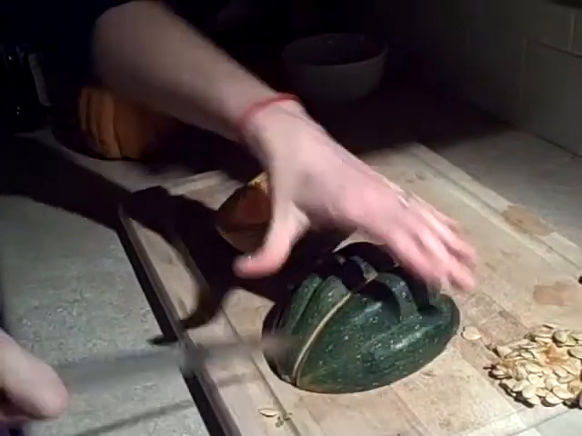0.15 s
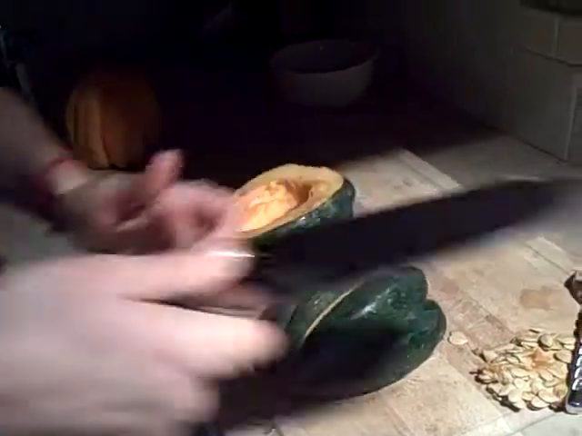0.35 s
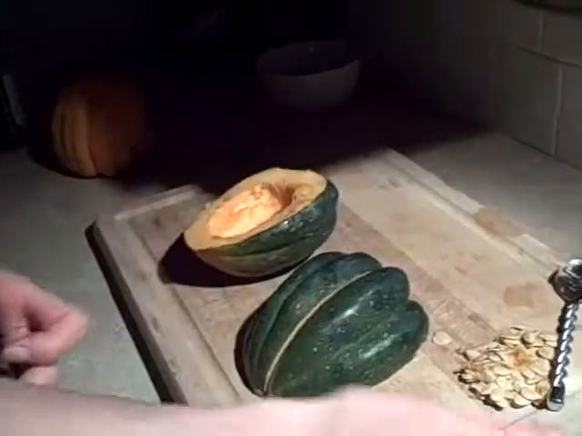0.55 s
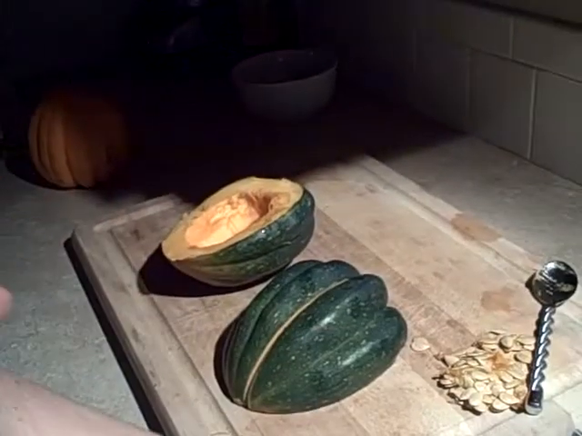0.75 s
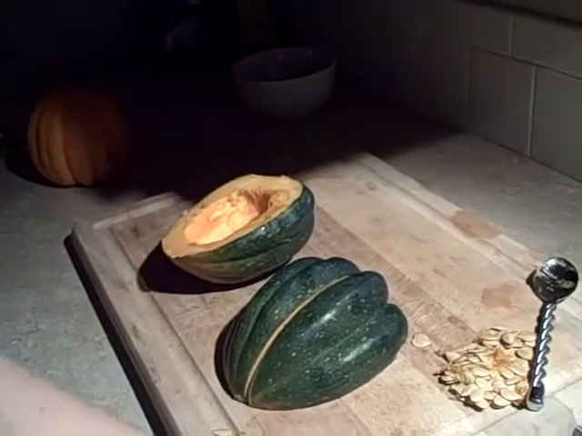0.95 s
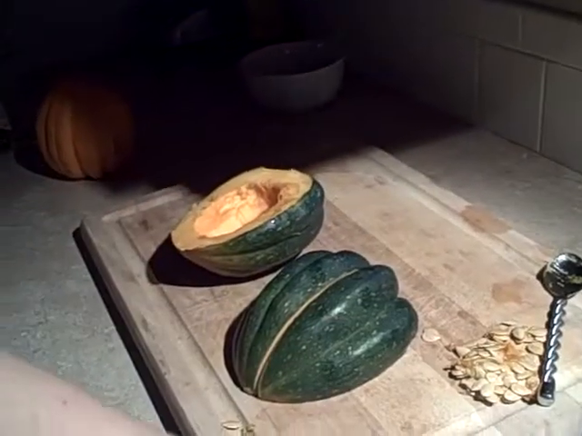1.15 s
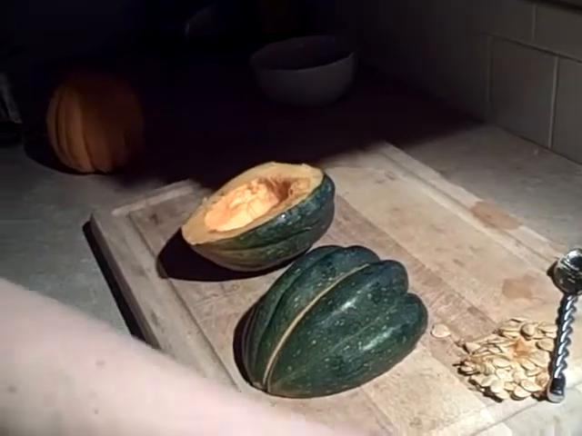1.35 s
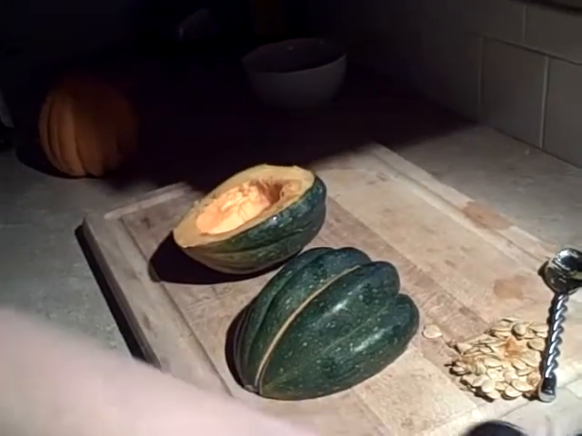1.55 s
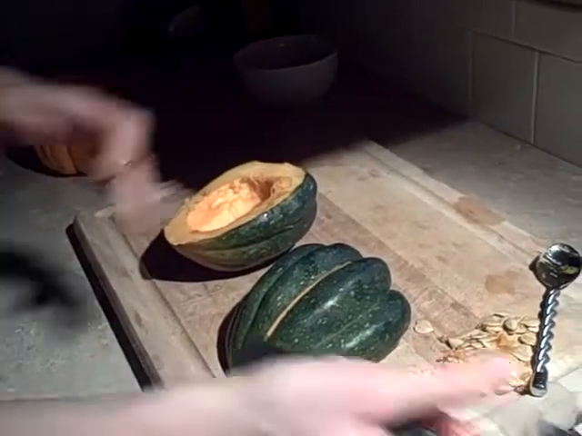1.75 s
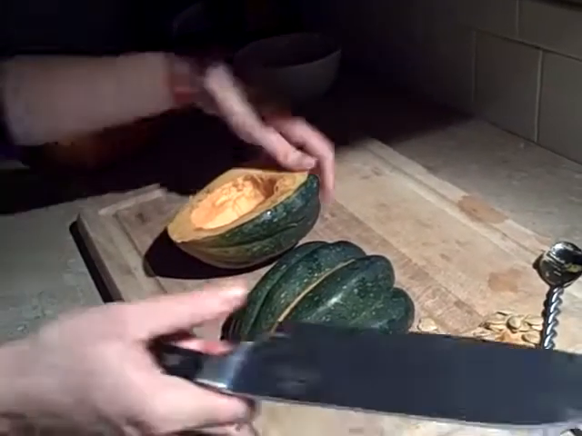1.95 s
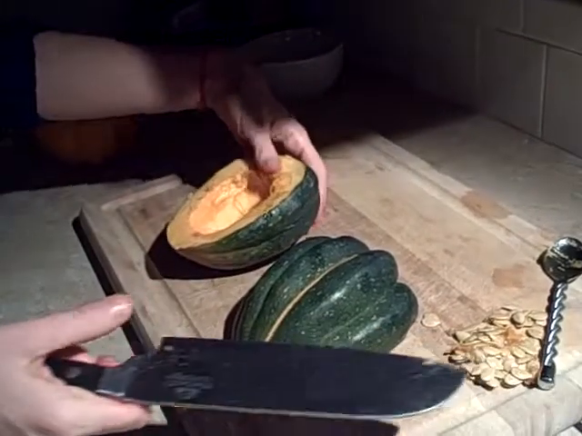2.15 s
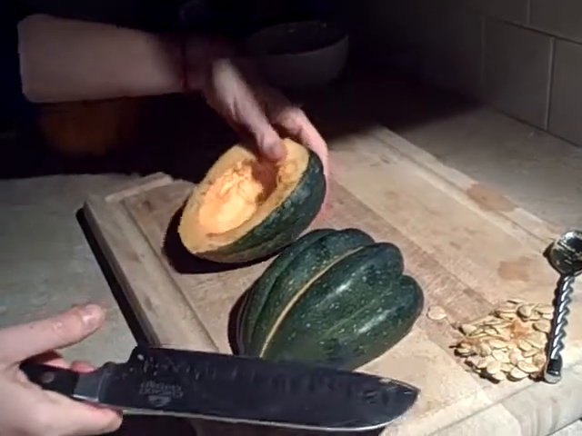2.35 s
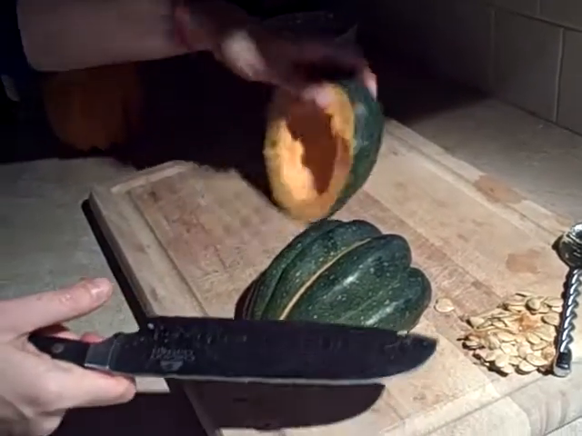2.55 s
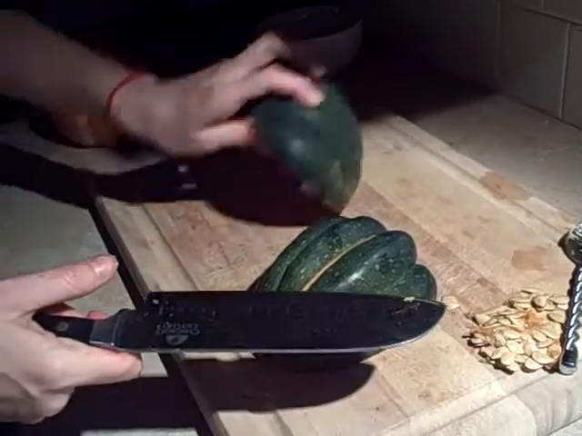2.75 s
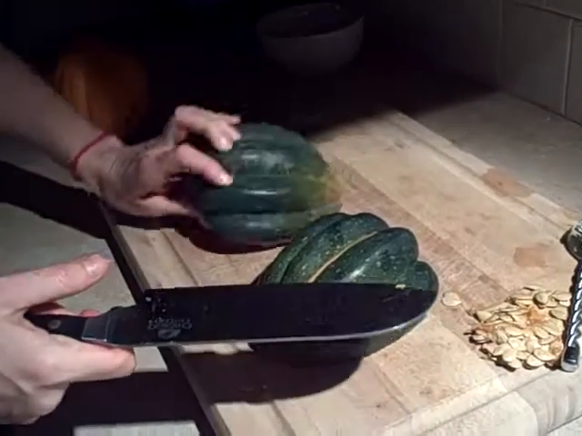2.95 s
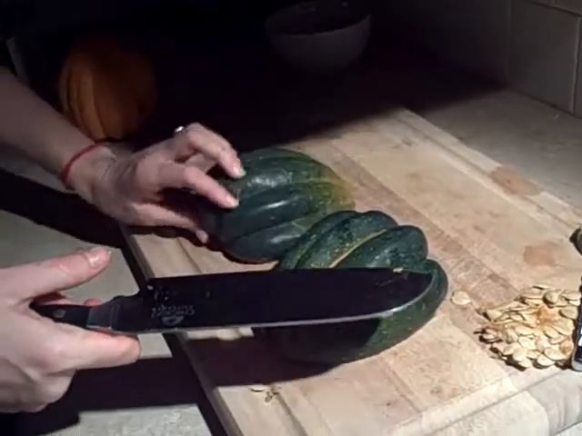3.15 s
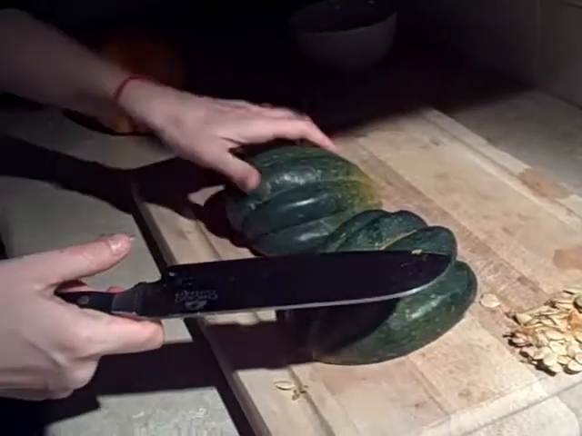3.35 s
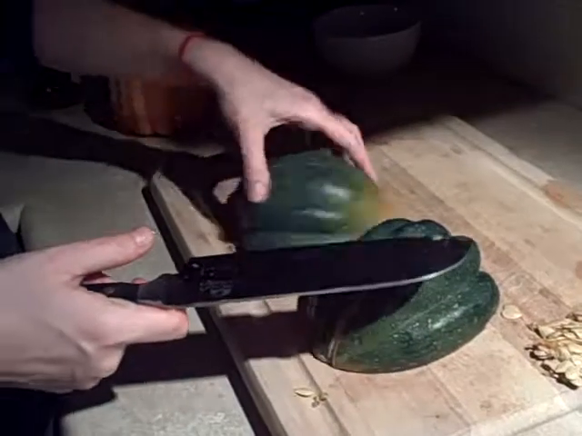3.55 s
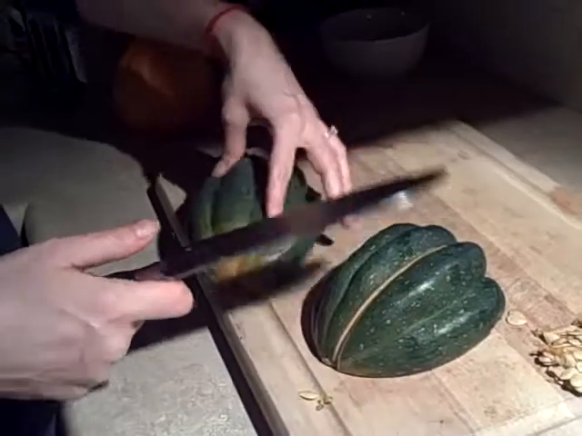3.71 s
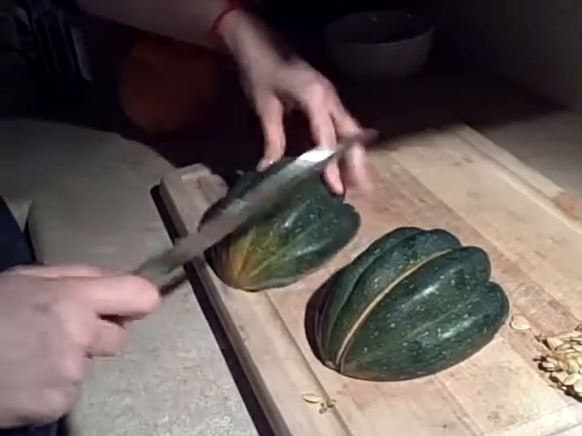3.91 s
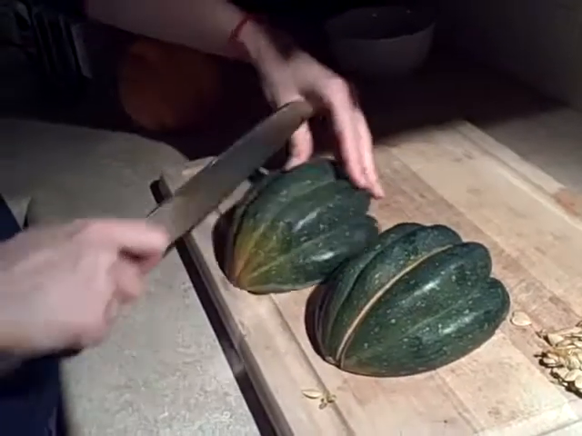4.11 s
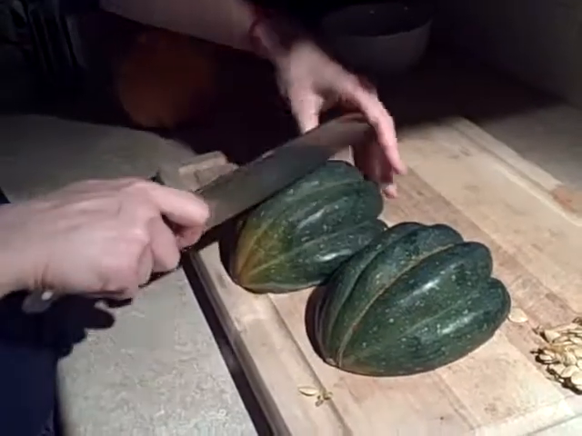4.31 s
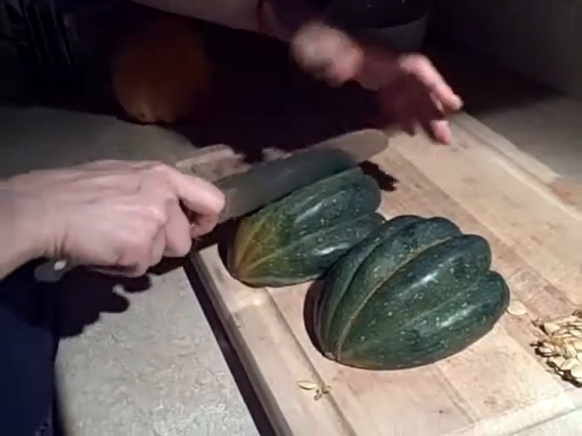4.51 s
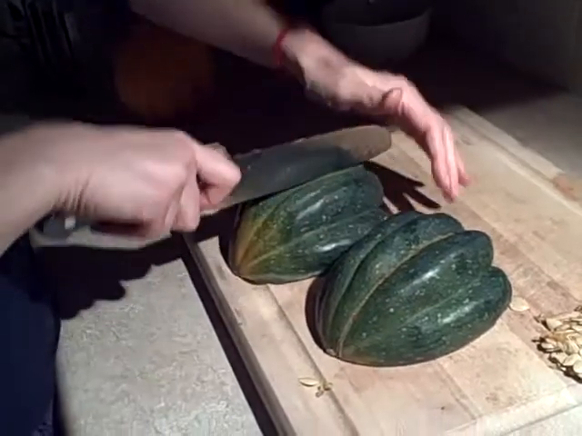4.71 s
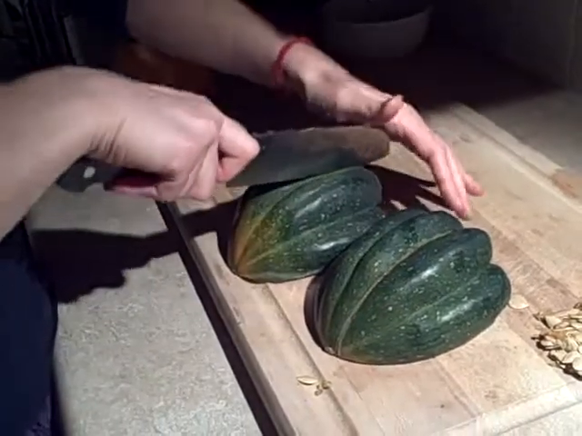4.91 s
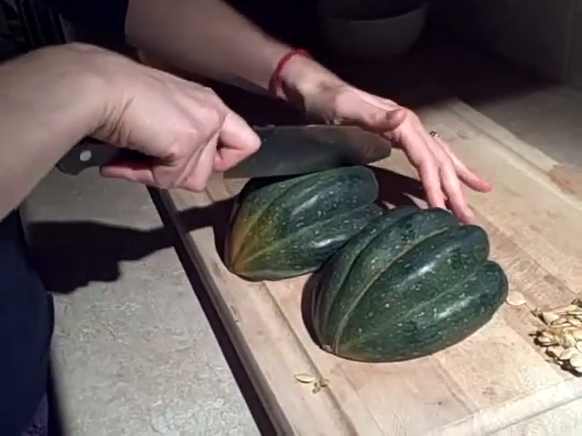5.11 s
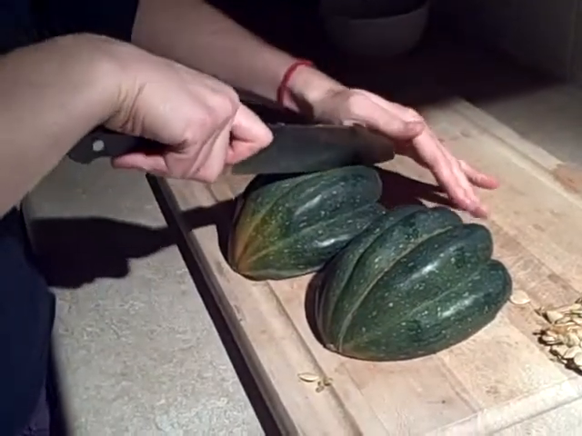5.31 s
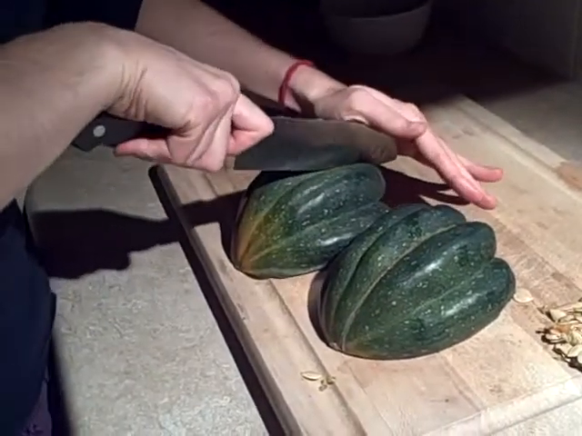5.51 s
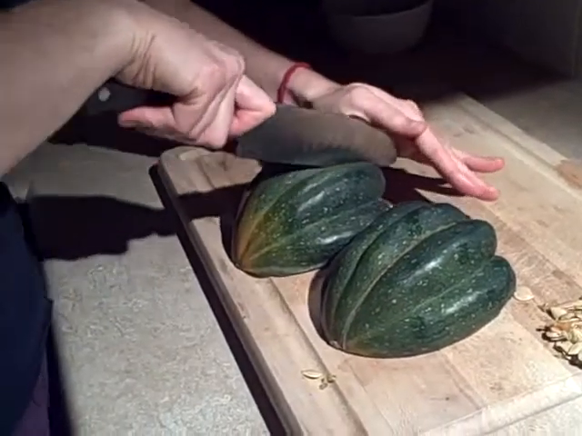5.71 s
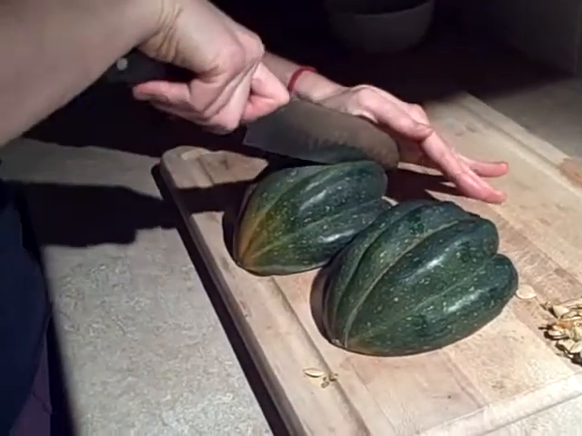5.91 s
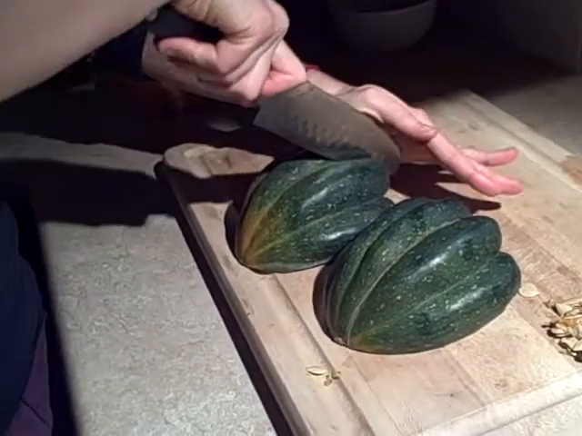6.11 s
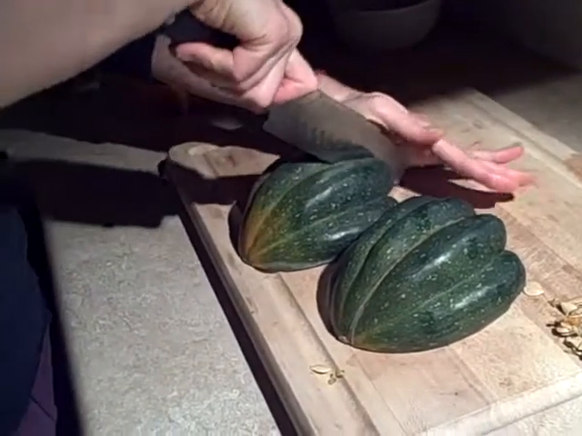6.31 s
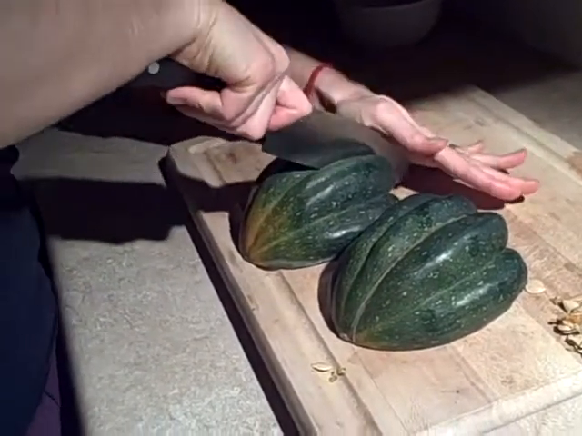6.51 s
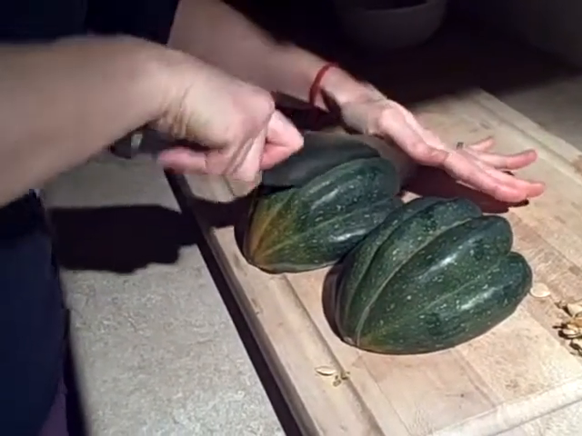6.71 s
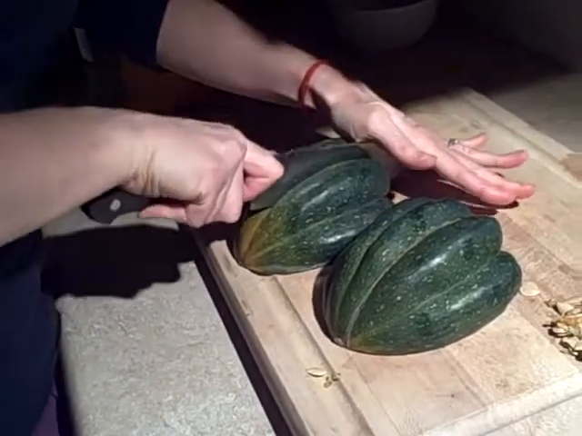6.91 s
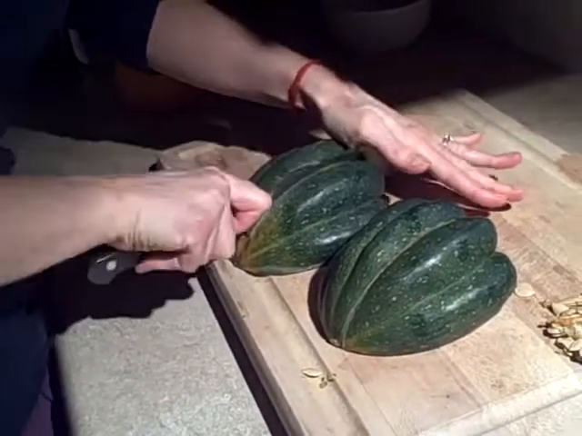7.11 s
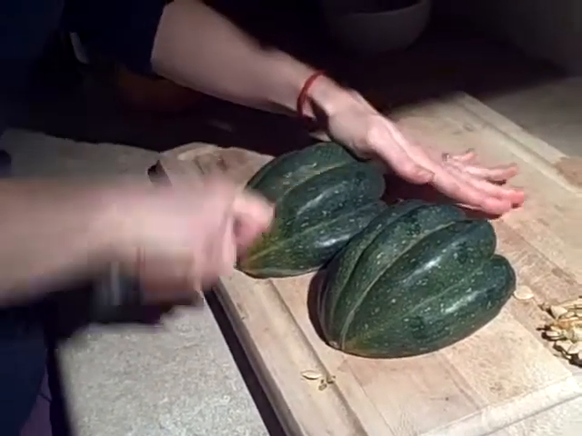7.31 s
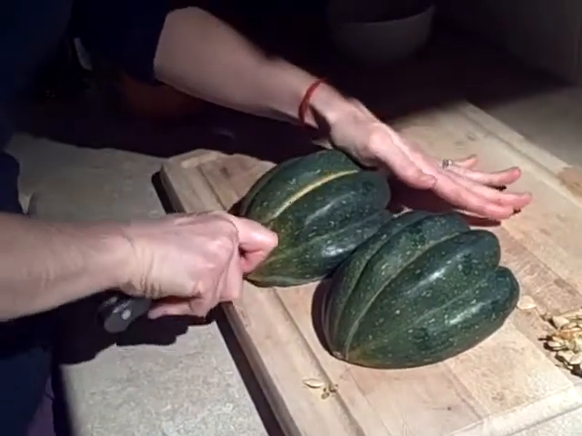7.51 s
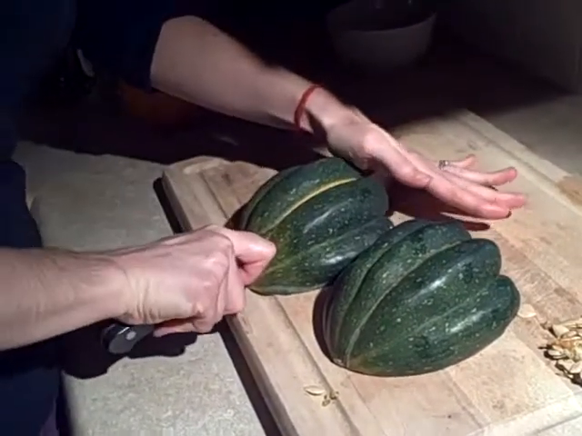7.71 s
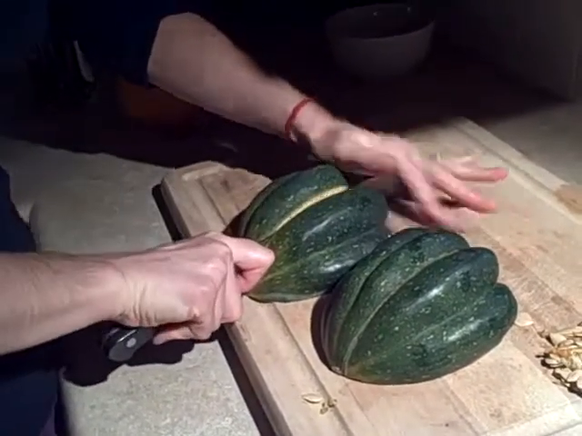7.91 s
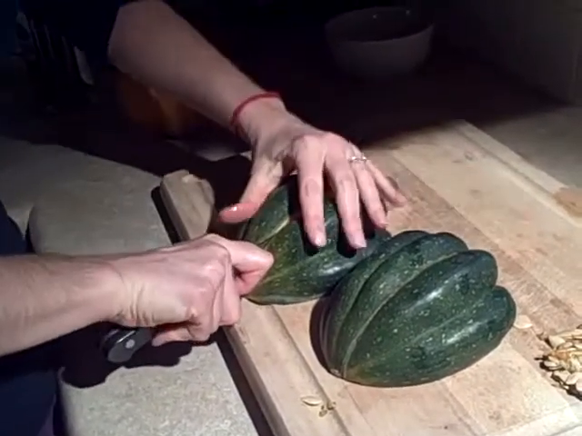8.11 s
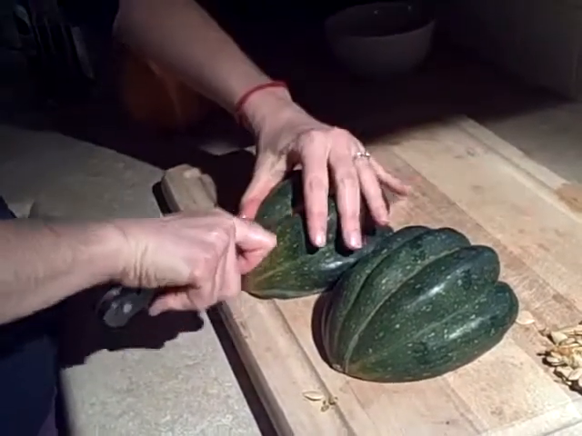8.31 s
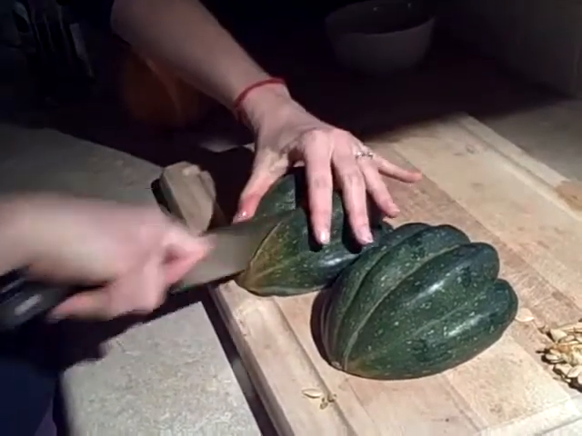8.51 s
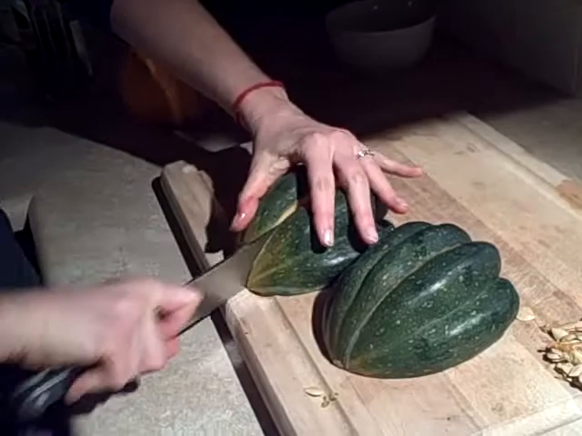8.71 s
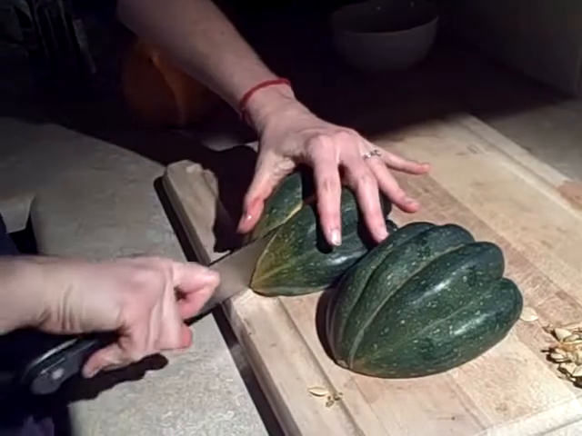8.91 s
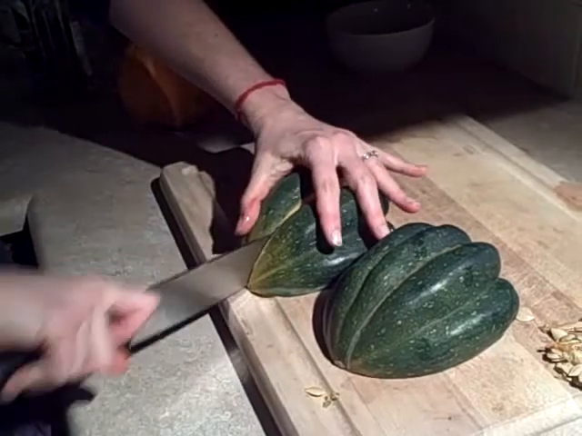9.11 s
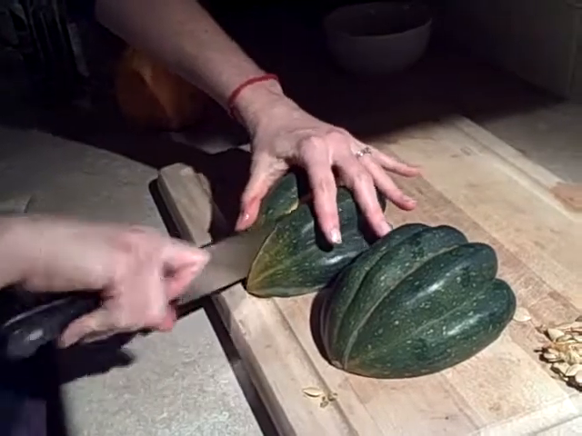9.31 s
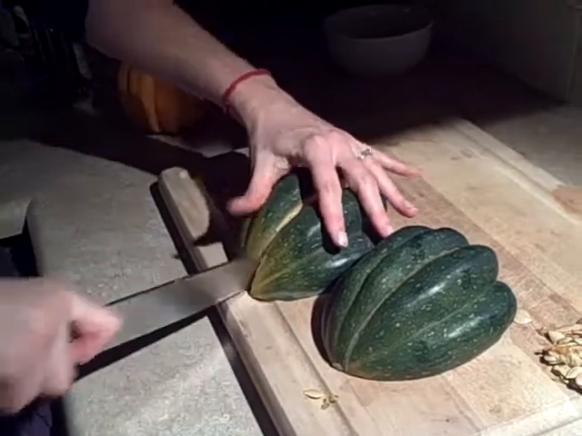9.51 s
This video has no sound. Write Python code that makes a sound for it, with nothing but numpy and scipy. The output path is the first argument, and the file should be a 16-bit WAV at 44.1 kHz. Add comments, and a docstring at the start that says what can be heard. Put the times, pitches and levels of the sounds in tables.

```python
"""A knife rocks through a hard squash in short tearing slips, slams into a wooden board and is drawn out.
The squash crackles and creaks, the board rings, and the blade rubs and hisses in the wet slit.
Before the cutting, loose metal, perhaps cutlery in a drawer, slides and jingles nearby and bangs once.
The counter thumps under the hands over a quiet hiss. One microphone is near the board in a home kitchen."""
import sys
import numpy as np
from scipy import signal
from scipy.fft import rfft, irfft
from scipy.io import wavfile
from scipy.ndimage import uniform_filter1d

SR = 44100
rng = np.random.default_rng(int(sys.argv[2]) if len(sys.argv) > 2 else 0)


def put_to_file(sound):
    """Save the sound as 16-bit audio at rate SR, in the file named by the first command-line argument."""
    columns = np.atleast_2d(sound).T  # one column per channel
    safe = np.clip(columns, -1, 1)
    whole_steps = np.round(safe * 32767)
    wavfile.write(sys.argv[1], SR, whole_steps.astype(np.int16))


N = 421155

# Shakes of the loose metal. Each row: peak time in seconds, treble level in dB, rise and fall in seconds.
METAL_SHAKES = [(.385, -38, 0.0083, 0.12), (.572, -46.5, 0.027, 0.12), (.675, -43, 0.0091, 0.1),
                (.83, -36, 0.016, 0.67), (.92, -35.5, 0.053, 0.15), (1.063, -30, 0.16, 0.14),
                (1.277, -26, 0.17, .15), (1.492, -31, 0.22, .18), (1.646, -26, 0.083, 0.25),
                (1.906, -35, 0.31, 0.1), (2.045, -35.5, 0.076, 1), (2.19, -32, 0.2, 0.3),
                (2.385, -30.5, 0.071, 0.22), (2.679, -27, 0.11, 0.24), (2.978, -35.5, 0.31, 0.12),
                (3.16, -36.5, 0.034, .2), (3.193, -24.5, 0.022, 0.28), (3.34, -37, 0.22, .047),
                (3.542, -29.5, .1, .16), (3.881, -29.5, 0.3, 0.12), (4.07, -45, 0.087, 0.077)]
# The counter's deep notes. Each row: pitch in Hz, level in dB, seconds to fade by 60 dB (called t60).
COUNTER_NOTES = [(52, -3, .12), (74, 0, .14), (130, -7, .07), (200, -10, .06)]


def cut():
    """Fibres snap in a crackling tear; the hollow squash creaks with each slip of the knife."""
    # Each row: peak time in seconds, level in dB, rise and fall in seconds, creak in dB above the tear.
    knife_slips = [(4.265, -66, 0.02, 0.16, 5), (4.97, -60.5, 0.091, 0.1, -14), (5.5, -63, 0.049, 0.15, -4),
                   (6.17, -65.5, 0.27, 0.11, 6), (6.292, -43, 0.004, 0.09, 2.5),
                   (6.351, -47, 0.085, 0.019, 3), (6.535, -45.5, 0.045, 0.024, 6),
                   (6.745, -45, 0.044, 0.033, 5.5), (6.865, -46, 0.0053, .1, -7),
                   (6.924, -43, 0.078, 0.051, 1.5), (7.125, -43, 0.053, 0.12, 1),
                   (7.303, -45.5, 0.006, 0.036, 1), (7.346, -25, 0.0075, 0.0068, -3.5),
                   (7.482, -39.5, 0.018, .008, -4), (7.498, -29, 0.042, 0.027, 1),
                   (7.565, -50, 0.0034, 0.016, -1), (7.58, -61.5, 0.044, 0.071, 18),
                   (8.83, -43, 0.039, 0.12, 9)]
    # The tone of the tear. Each row: frequency in Hz, level in dB.
    tear_tone = [(700, -31.5), (1000, -10.5), (3580, -3.5), (9280, -9), (16000, -7)]
    # The notes of the creak. Each row: pitch in Hz, width in Hz, level in dB.
    creak_notes = [(365.5, 80, 5), (599, 40, -1.5), (799, 180, -7), (1010, 70, -5.5)]
    tear_db, creak_db = strokes(knife_slips, round_top=1.61)
    tear = colour(grit(spread_db=2.5, grain_s=0.00089), tear_tone)
    creak = body(grit(spread_db=1.5, grain_s=.003), creak_notes, wander_db=4.0, wander_rate=8, drift=.1)
    return undb(tear_db) * (tear + undb(creak_db) * creak)


def knocks():
    """Each blow rings board and squash, thumps the counter and starts with a short crack."""
    # Each row: start in seconds, strength in dB, thump and crack offsets in dB, hardness in dB per octave.
    blows = [(2.129, -41.5, 4, 8, -11), (3.243, -26, 5.5, -6, -27), (3.812, -23, -3, -12, -6.5),
             (3.834, -23.5, -1.5, -5, -18), (4.261, -44, -10, -10, 0), (4.329, -29.5, -3.5, -1.5, -8),
             (4.63, -32.5, -4.5, 1, 5.5), (5.838, -41, -6, 13, 14), (6.365, -43.5, 13.5, -17, 3),
             (6.509, -42.5, 14, -3, 13), (6.532, -16, -6, -14, -15.5), (7.315, -36.5, 10, 23.5, 14.5),
             (7.349, -2, -19, -2, 4), (7.363, -12, -16, -18.5, -2.5), (7.536, -22.5, -2, -26, 3.5),
             (7.769, -36.5, 2, -20.5, -4), (8.063, -40, -4, 6, 3), (8.082, -41, -2, -25, 9.5),
             (8.8, -17, -12.5, -5, -1), (8.813, -23, -17, 15, 11.5), (8.906, -23.5, -1.5, -18, -2)]
    # The notes of the board and of the squash. Each row: pitch in Hz, level in dB, fade time in seconds.
    board_notes = [(567, -7, .09), (682, -9, .08), (838, 0, .11), (905, -1, .11), (1042, -7, .08),
                   (1340, -10, .07), (1534, -9, .06)]
    squash_notes = [(250, -9, .05), (366, -3, 0.042), (460, -3, 0.051), (594, -3.5, 0.049), (748, 1, 0.058),
                    (1245, -3.5, 0.044), (1540, -7, 0.052)]
    out, t = np.zeros(N), np.arange(int(.3 * SR)) / SR
    for s, db, thump_db, crack_db, tilt_db in blows:
        noise = rng.standard_normal(len(t))
        free = np.clip(1.5 + db / 40, .3, 1)  # a light touch stays pressed on the wood and damps it
        board_db = 1.24 * db  # lighter blows lose extra ring
        add(out, s, undb(board_db) * ring(board_notes, tilt_db, noise, free=free))
        add(out, s, undb(db - 1.5) * ring(squash_notes, tilt_db / 2, noise[50:], detune=.05))
        overtones = crunch(noise, tilt_db, low_t60=0.062 * free, high_t60=0.02 * free)
        add(out, s, undb(db + tilt_db / 2 + 2.0) * overtones)
        add(out, s, undb(db + thump_db) * ring(COUNTER_NOTES, 0, noise, detune=0.039, push_s=0.011))
        crack = np.diff(noise, prepend=0) * np.exp(-t / 0.0066) * np.clip(t / 0.0017, 0, 1)
        add(out, s, undb(db + crack_db - 17.5) * crack)
    return out


def crunch(noise, tilt_db, low_t60, high_t60):
    """The countless close overtones of wood blur into noise whose treble dies first."""
    t = np.arange(len(noise)) / SR
    low = signal.lfilter(*signal.butter(1, [400, 2600], "band", fs=SR), noise) * 1000 ** (-t / low_t60)
    high = signal.lfilter(*signal.butter(1, [2600, 8000], "band", fs=SR), noise) * 1000 ** (-t / high_t60)
    return (low + undb(2 * tilt_db - 14.0) * high) * np.clip(t / 0.0043, 0, 1)


def draw_blade():
    """The blade rubs along the slit, sounds its hollow notes, hisses wetly and sings in shifting bands."""
    # Each row: peak time in seconds, level in dB, rise and fall in seconds,
    # treble and upper-note offsets in dB, pitch ratio.
    pulls = [(.14, -48, 0.14, .09, 0.5, -11, 0.99), (8.53, -49.5, 0.032, .2, -3.5, -16, 1.03),
             (8.63, -44, 0.097, 0.23, -1.5, -5, .97), (8.72, -43.5, .16, 0.058, -3, -11.5, 1.046),
             (9.03, -62, 0.034, 0.082, 7, -12, 0.94), (9.12, -46.5, .035, 0.095, -7, -14, 1.03),
             (9.19, -38.5, 0.089, 0.076, -2.5, -6, 1.01), (9.36, -41.5, 0.11, 0.067, -2, -9.5, 0.99),
             (9.54, -43, 0.098, 0.12, -5, -8, 0.95)]
    # The slit's low and upper notes. Each row: pitch in Hz, width in Hz, level in dB.
    low_notes = [(675, 400, 2), (940, 62, -4.5), (1508, 78, 7)]
    upper_notes = [(2150, 290, -10.5), (2913, 200, -15), (3640, 300, -9)]
    # The tone of the wet hiss. Each row: frequency in Hz, level in dB.
    wet_tone = [(4000, -37), (5000, 3.5), (16000, 1)]
    rub_db, treble_db, upper_db, pitch = strokes(pulls, round_top=1.7)
    pitch = uniform_filter1d(pitch, SR // 10)  # the slit changes shape gradually
    slips = grit(spread_db=2.0, grain_s=.002)
    focused = sum(resonate(slips, hz, 3 * width) for hz, width, _ in low_notes + upper_notes)
    hollow = body(focused, low_notes, wander_db=3.0, wander_rate=14, drift=.02, pitch=pitch)
    upper = body(focused, upper_notes, wander_db=4.0, wander_rate=12, drift=.04, pitch=pitch)
    wet = colour(grit(spread_db=2.0, grain_s=0.001), wet_tone)
    bands = [(hz, 200, 0) for hz in rng.uniform(4200, 15300, size=12)]  # each 200 Hz wide
    singing = body(slips, bands, wander_db=9.0, wander_rate=20)
    treble = undb(-6) * wet + undb(-6.5) * singing
    return undb(rub_db) * (hollow + undb(upper_db) * upper + undb(treble_db) * treble)


def jingle():
    """Dense tiny collisions ring the loose metal over a broad scrape."""
    # The metal's notes. Each row: pitch in Hz, width in Hz, level in dB.
    metal_notes = [(2084, 130, -9), (3235, 66, -2), (4660, 190, -8), (6000, 170, -2.5), (7590, 110, -1.5),
                   (8660, 66, -3), (10210, 42, 6), (11550, 61, 5), (13700, 310, 3), (15230, 280, 2)]
    # The tones of its hiss and its scrape. Each row: frequency in Hz, level in dB.
    hiss_tone = [(6700, -53), (7000, -8), (7700, 6.5), (16000, 1.5)]
    scrape_tone = [(300, -18.5), (750, -8), (1130, -4.5), (2660, -5.5), (3650, -3.5), (6800, -2),
                   (8000, -32)]
    treble_db, = strokes(METAL_SHAKES, round_top=1.28)
    sliding_db = np.minimum(-43 + 0.7 * (treble_db + 31.5), treble_db - 5.5)  # swings less than the treble
    sliding = np.arange(N) / SR > 0.78  # the scrape is weaker until the sliding starts
    scrape_db = np.where(sliding, sliding_db, treble_db - 15.5)
    slips = grit(spread_db=1.0, grain_s=.0006)
    rings = body(slips, metal_notes, wander_db=3.5, wander_rate=14, drift=.007)
    treble = colour(slips, hiss_tone) * undb(-5.5) + rings * undb(-5.0)
    scrape = colour(slips, scrape_tone)
    return undb(treble_db) * treble + undb(scrape_db) * scrape + clinks(treble_db - 5.0)


def clinks(level_db, count=700):
    """Countless small pieces each give a brief pure note, as hard as they are shaken."""
    out, t = np.zeros(N), np.arange(SR // 8) / SR
    first_s, last_s = METAL_SHAKES[0][0], METAL_SHAKES[-1][0]
    for when, pitch, softness, length in rng.random((count, 4)):
        s = first_s + when * (last_s - first_s)
        db = level_db[int(s * SR)] - 14 * softness
        hz, t60 = 7200 + 8300 * pitch, 0.076 + 0.074 * length
        add(out, s, undb(db) * np.sin(2 * np.pi * hz * t) * 1000 ** (-t / t60))
    return out


def pings():
    """Single metal pieces ring on one tone whose level wobbles as they keep touching others."""
    # Each row: start in seconds, pitch in Hz, level in dB before the wobble, fade time in seconds.
    strikes = [(.575, 3250, -56, .5), (.685, 3250, -50, .3), (1.06, 3250, -40, .35), (.93, 5580, -41, .1),
               (3.88, 5450, -45, .45), (3.86, 7849, -41, .3), (3.86, 6245, -45, .4)]
    out, t = np.zeros(N), np.arange(SR // 2) / SR
    for s, hz, db, t60 in strikes:
        envelope = 1000 ** (-t / t60) * np.clip(t / 0.0062, 0, 1)
        add(out, s, undb(db) * np.sin(2 * np.pi * hz * t) * envelope)
    return out * undb(4.9 * walk(60))


def drawer_bang(start_s=1.222, db=-6):
    """One bang rings the drawer, with a dull crunch and a faint thump of the counter."""
    # Each row: pitch in Hz, level in dB, fade time in seconds.
    drawer_notes = [(556, -9.5, 0.086), (1026, -3.5, .07), (1322, -1, 0.087), (1481, -2.5, 0.076),
                    (2000, -1, 0.077), (2460, -14, 0.018), (2760, -0.5, 0.086), (2890, 0, 0.036),
                    (3135, 4.5, 0.025), (3670, -0.5, 0.054)]
    out, noise = np.zeros(N), rng.standard_normal(int(.3 * SR))
    add(out, start_s, undb(db) * ring(drawer_notes, 0, noise, split=0.014))
    add(out, start_s, undb(db - 26.5) * ring(COUNTER_NOTES, 0, noise))
    add(out, start_s, undb(db - 6.0) * crunch(noise, tilt_db=-34.5, low_t60=0.17, high_t60=0.055))
    return out


def kitchen_echo(x, t60=0.25, db=-10):
    """Hard walls return a dense tail that loses its treble first."""
    t = np.arange(int(.7 * SR)) / SR
    noise = rng.standard_normal(len(t))
    dull = signal.lfilter([.25], [1, -.75], noise)
    tail = dull * 1000 ** (-t / t60) + 0.071 * noise * 1000 ** (-t / 0.09)
    tail *= np.clip(t / 0.007, 0, 1)
    return signal.fftconvolve(x, tail / np.sqrt(np.sum(tail ** 2)))[:N] * undb(db)


def background():
    """The room hisses with a faint hum; the counter rumbles as hands press and shift on it."""
    # The tone of the room. Each row: frequency in Hz, level in dB.
    room_tone = [(15, -35.5), (25, -1.5), (82, -4), (123, -9), (335, -10.5), (531, -18.5), (624, -13),
                 (754, -18.5), (14800, -33.5), (16000, -28)]
    # The rumble under the hands. Each row: time in seconds, level in dB.
    rumble_levels = [(0, -66.5), (2.5, -61.5), (2.719, -46), (3.0, -66), (4.4, -56), (5.0, -66.5),
                     (6.2, -66.5), (6.6, -51.5), (7.6, -54), (8.2, -61.5), (9.55, -60.5)]
    hiss = colour(rng.standard_normal(N), room_tone) * undb(-59 + 1.5 * walk(4.8))
    rumble_notes = [(45.5, 33, -5.0), (73.4, 19, 12.0)]  # Each row: pitch in Hz, width in Hz, level in dB.
    rumble = body(rng.standard_normal(N), rumble_notes, wander_db=-2.0, wander_rate=7.1)
    rumble_db = np.interp(np.arange(N) / SR, *np.transpose(rumble_levels))
    return hiss + undb(rumble_db) * rumble


def undb(db):
    """Turn decibels into a gain."""
    return 10 ** (np.asarray(db) / 20)


def unit(x):
    """Scale to an average power of 1."""
    return x / np.sqrt(np.mean(x ** 2))


def colour(x, points):
    """Shape the tone along (Hz, dB) points, almost silent beyond them."""
    hz, db = np.transpose(points)
    bins_hz = np.arange(N // 2 + 1) * SR / N + 1e-3
    gain = undb(np.interp(np.log(bins_hz), np.log(hz), db, -90, -90))
    return unit(irfft(rfft(x) * gain, N))


def resonate(x, hz, width_hz):
    """Keep one band of the sound, with gain 1 at its centre."""
    return signal.lfilter(*signal.iirpeak(min(hz, .45 * SR), hz / width_hz, SR), x)


def walk(rate):
    """A smooth random curve that heads for a new value `rate` times a second."""
    hold = int(SR / rate)
    steps = np.repeat(rng.standard_normal(N // hold + 1), hold)
    return uniform_filter1d(uniform_filter1d(steps, hold), hold)[:N]


def grit(spread_db, grain_s):
    """Friction: noise made of short slips of very unequal size."""
    hold = max(int(grain_s * SR), 1)
    size = np.repeat(undb(spread_db * rng.exponential(size=N // hold + 1)), hold)[:N]
    return unit(size * rng.standard_normal(N))


def body(x, notes, wander_db, wander_rate, drift=0., pitch=1.):
    """A rubbed object's notes wander in level, and with drift in tuning, as the contact point moves."""
    out = 0
    for hz, width, db in notes:
        tone = unit(resonate(x, hz, width))
        if drift:
            speed = pitch + drift * walk(wander_rate)  # reading faster raises the note
            tone = np.interp(np.cumsum(speed) % (N - 1), np.arange(N), tone)
        out = out + undb(db + wander_db * walk(wander_rate)) * tone * np.sqrt(width)
    return unit(out)


def ring(notes, tilt_db, chance, detune=0.012, free=1.0, split=.03, push_s=0.0038):
    """A struck object's notes, peak 1; every blow lands elsewhere, so strengths and tuning shift."""
    hz, db, t60 = np.transpose(notes)[:, :, None]
    t = np.arange(int(2 * np.max(t60) * SR)) / SR
    size, sign, tune, apart = chance[:4 * len(notes)].reshape(4, -1, 1)
    gain = undb(db + tilt_db * np.log2(hz / 800) + 1.5 * size) * np.sign(sign)
    phase = 2 * np.pi * hz * (1 + detune * tune) * t
    twin_ratio = 1 + split * np.sign(apart) * (1 + np.abs(apart) / 2)
    pair = np.sin(phase) + 0.78 * np.sin(phase * twin_ratio)  # two close tones beat
    sound = np.sum(gain * pair * 1000 ** (-t / (free * t60)), axis=0)
    sound *= np.clip(t / push_s, 0, 1)  # the push takes a moment
    return sound / np.max(np.abs(sound))


def strokes(rows, round_top):
    """Follow the loudest stroke's level in dB and its extra columns; rise and fall each span 20 dB."""
    peak_s, db, rise, fall, *extras = np.transpose(rows)[:, :, None]
    t = np.arange(0, N / SR, .001)
    distance = np.maximum((peak_s - t) / np.abs(rise), (t - peak_s) / np.abs(fall))
    levels = db - 20 * distance ** round_top  # a power above 1 rounds the peak
    loudest = np.argmax(levels, axis=0)
    curves = [np.maximum(np.max(levels, axis=0), -120)] + [extra[loudest, 0] for extra in extras]
    return [np.interp(np.arange(N) / SR, t, curve) for curve in curves]


def add(track, s, sound):
    """Mix a sound into the track, starting at s seconds."""
    i = int(s * SR)
    track[i:i + len(sound)] += sound[:N - i]


def scene():
    """All sources, their echo and the room, the same in both channels."""
    near = jingle() + pings() + cut() + draw_blade() + knocks() + drawer_bang()
    return np.tile(near + kitchen_echo(near) + background(), (2, 1))


def record(dry):
    """The hardest blow overloads the input; treble above 15750 Hz is cut."""
    return signal.sosfilt(signal.ellip(10, .2, 80, 15750, fs=SR, output="sos"), np.clip(dry, -1, 1))


dry = scene()
out = record(dry)
put_to_file(out)
```